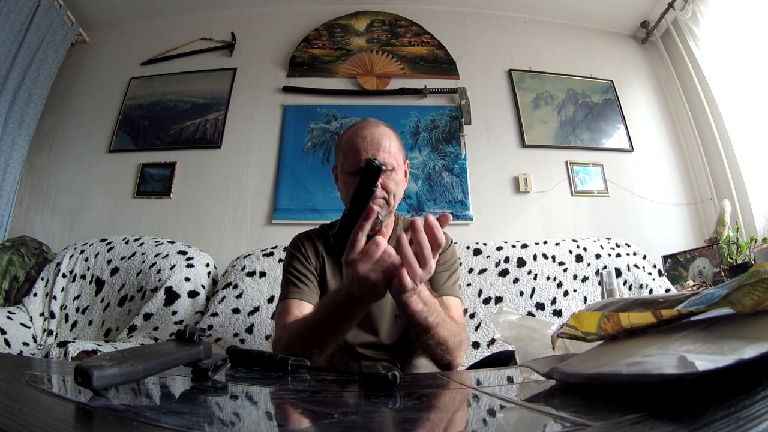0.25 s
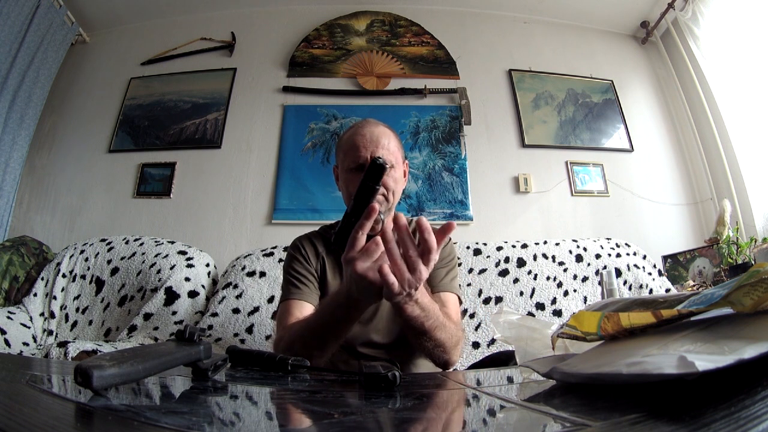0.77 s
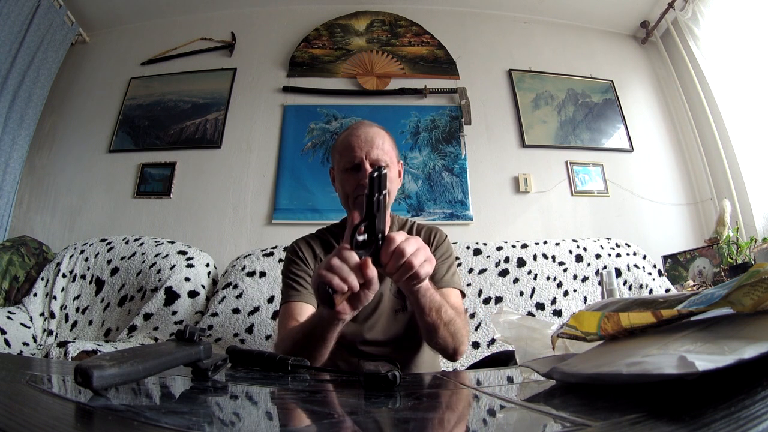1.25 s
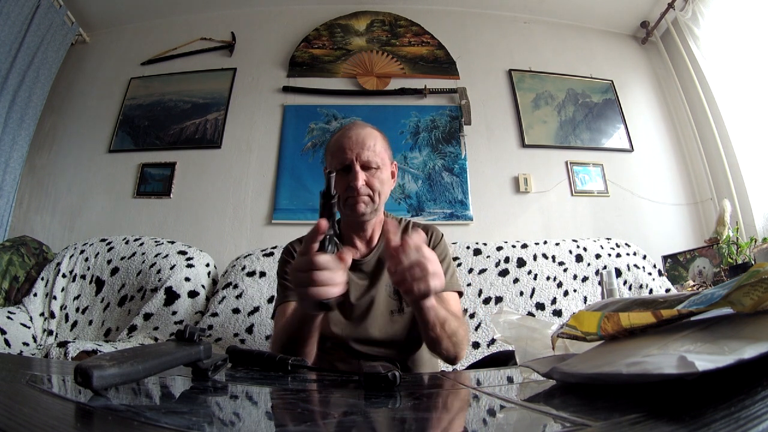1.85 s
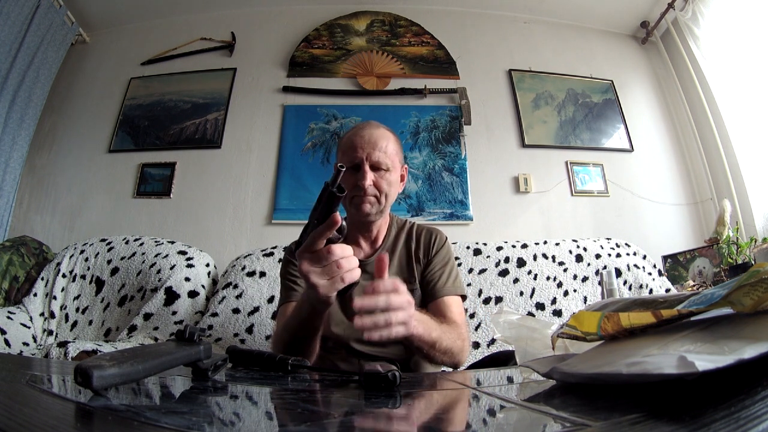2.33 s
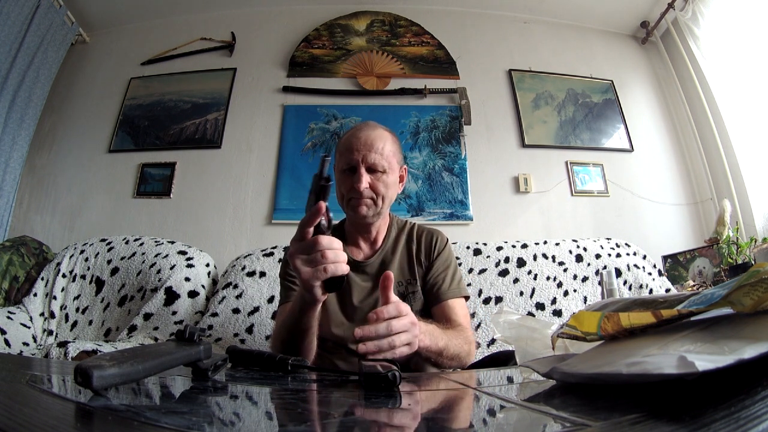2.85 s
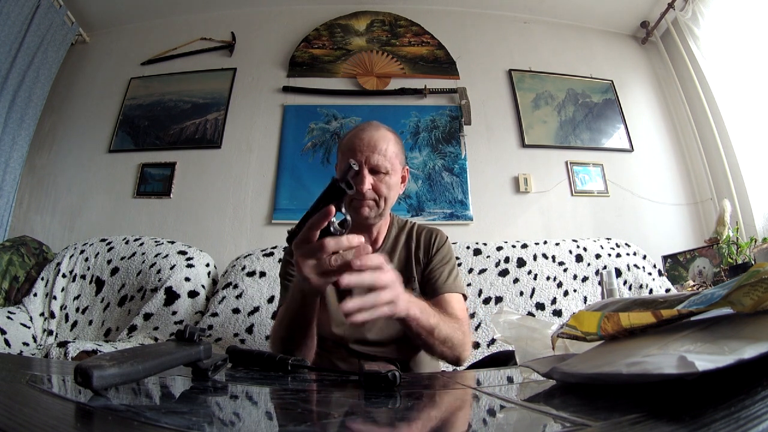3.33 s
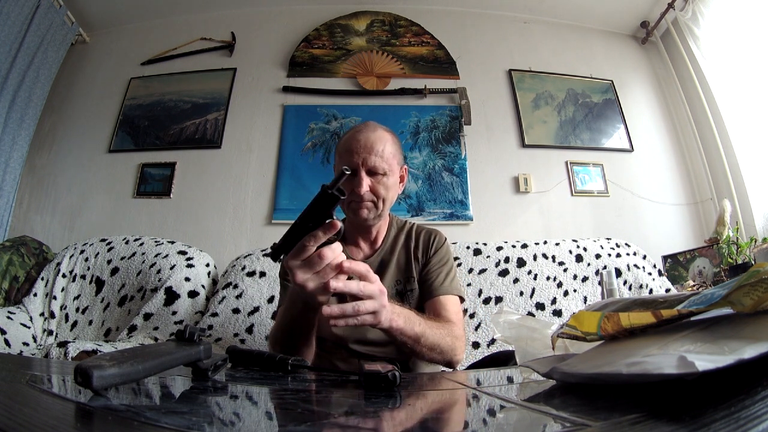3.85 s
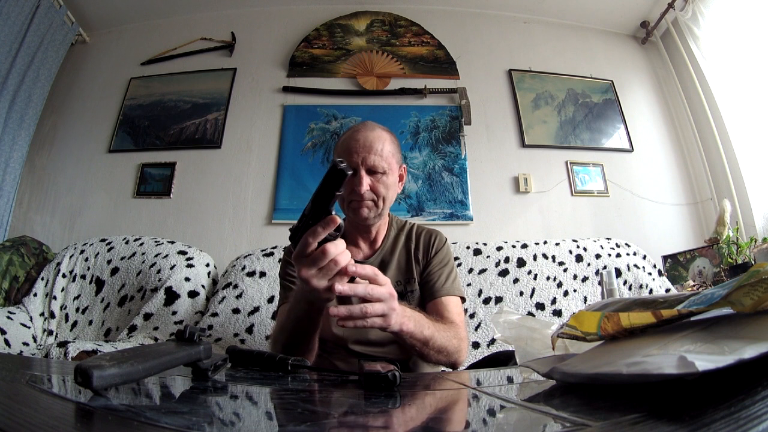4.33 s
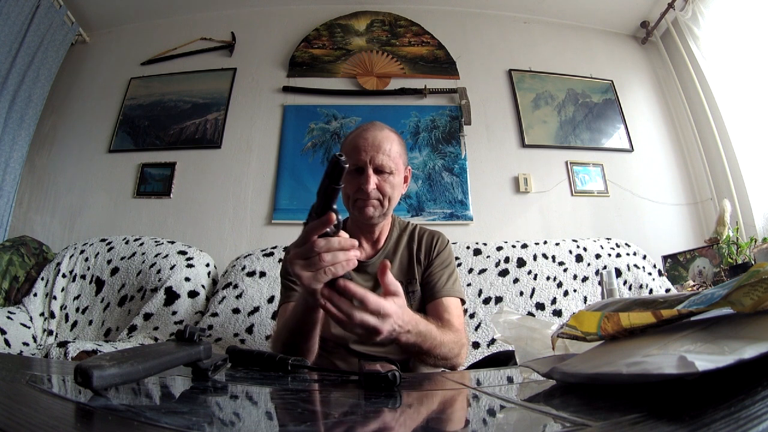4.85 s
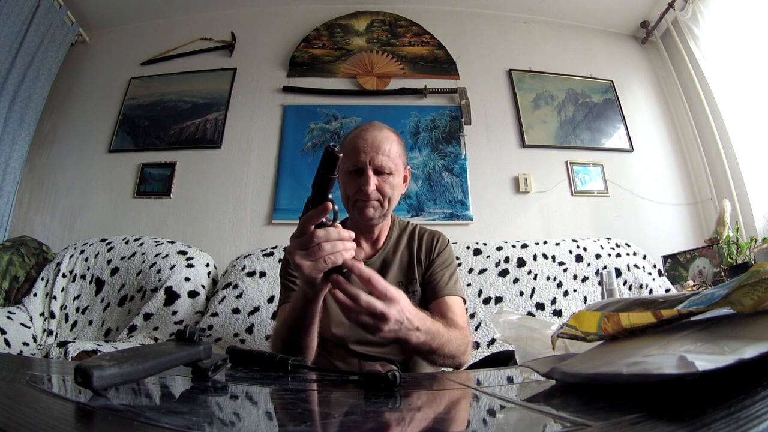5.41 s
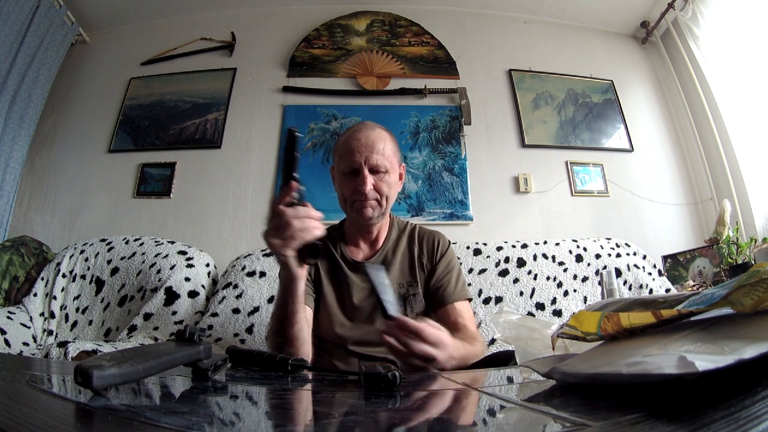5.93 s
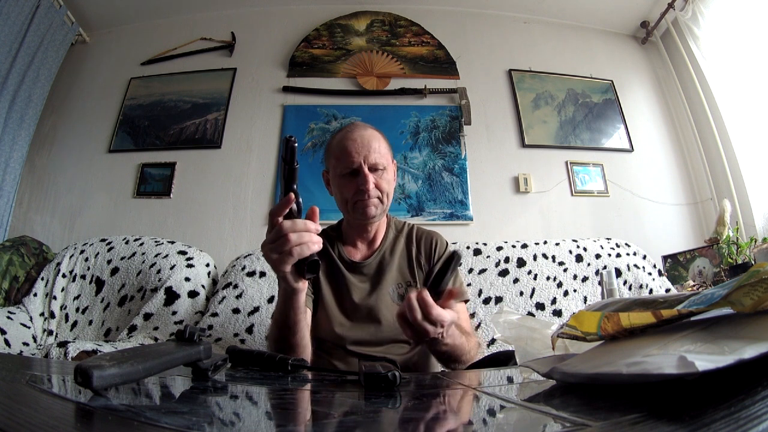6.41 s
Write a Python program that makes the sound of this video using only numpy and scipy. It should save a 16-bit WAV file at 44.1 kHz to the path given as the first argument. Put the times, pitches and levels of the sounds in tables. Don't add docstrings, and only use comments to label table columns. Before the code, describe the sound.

In a soft living room, hands work a pistol close to a small camera microphone. Clicks and a short scrape lead to a hard double clack at once, then a softer stop. The slide is racked again much louder, quiet handling follows with a very faint bird whistle, another violent clack rings out, then small clicks and dry magazine knocks and rubs over low room tone and slight hiss.

```python
import sys
import numpy as np
from scipy import signal
from scipy.fft import rfft, irfft
from scipy.io import wavfile
from scipy.ndimage import uniform_filter1d

SR = 44100
rng = np.random.default_rng(int(sys.argv[2]) if len(sys.argv) > 2 else 0)


def linear_from_db(decibels):
    return 10 ** (np.asarray(decibels, float) / 20)


def materialize(psi):
    bounded = np.clip(np.atleast_2d(psi).T, -1, 1)
    quanta = np.round(bounded * 32767).astype(np.int16)
    wavfile.write(sys.argv[1], SR, quanta)


N = 294091

# f/Hz, density level/dB
ROOM_TONE = [(10, -11), (30, -1), (64, -0.5), (150, -4), (420, -7), (860, -13), (2400, -20.5),
             (3050, -19.5), (3700, -25), (8000, -26), (12600, -25.5), (13000, -29.5), (15600, -29.5)]
# f/Hz, density level/dB
HISS = [(10, 1.5), (30, -7), (75, -2.5), (150, -8.5), (300, -19.5), (3000, -19), (12600, -18.5),
        (13000, -23.5), (15600, -25.5)]
ROOM_TONE_DB, HISS_DB = -58.5, -68.5
OFFSETS = [
    [-.0176],
    [-.0006],
]

# f/Hz, width/Hz, level/dB
FRAME_MODES = [(1367, 240, -7), (1716, 430, -2), (2210, 450, -5.5), (2660, 520, 0.5), (3190, 700, -2),
               (4500, 2400, -10)]
# f/Hz, width/Hz, level/dB
MAGAZINE_MODES = [(1750, 218, -0.5), (2883, 1730, -9.5), (3440, 280, 0), (5680, 380, -28)]
# start t/s, end t/s
MAGAZINE_IN_HAND = [
    (3.1, 3.8),
    (5.7, 6.1),
]
# f/Hz, level/dB, t60/s
STEEL_MODES = [(6360, -12, 0.07), (9670, -6, 0.013), (9820, 0, 0.024), (10650, -5, .05),
               (10860, -6.5, 0.043), (12060, -7, .04), (11880, -8, 0.022), (14800, -17, 0.019)]

# f/Hz, t60/s
ROOM_T60 = [(300, 0.69), (800, 0.3), (2100, 0.24), (5500, 0.22), (14600, 0.21)]
# f/Hz, level/dB
ROOM_COLOUR = [(300, -5.5), (800, -7), (1500, -1.5), (2700, -3.5), (5000, -3), (7500, -2), (10000, 3),
               (14000, -4)]

# t/s, peak level/dB, frame resonance f/Hz
FINGERS = [(0.002, -52, 1740), (0.415, -48, 1207), (0.448, -40, 2600), (1.016, -38, 2100),
           (1.048, -51.5, 2104), (1.235, -51.5, 2070), (1.269, -51, 946), (1.294, -49.5, 2110),
           (1.515, -45.5, 951), (2.815, -50, 2300), (2.94, -53, 1558), (3.846, -47, 1110)]
# t/s, peak level/dB, frame resonance f/Hz, crack level/dB re peak
CATCHES = [(0.09, -27, 2089, -26), (0.133, -29, 1800, -28), (0.156, -24, 3505, -24.5),
           (0.192, -10, 2193, -19), (0.204, -5, 2300, -20), (1.5, -35, 2165, -31),
           (1.535, -44.5, 2205, -26.5), (1.553, -42, 3288, -20.5), (1.572, -26.5, 3564, -11),
           (1.577, -21.5, 2250, -24), (1.583, -15, 1894, -13.5), (1.606, -19, 5600, -12),
           (1.618, -16, 2080, -17), (1.715, -20, 1030, -24), (1.719, -16.5, 2088, -26),
           (4.06, -9.5, 1939, -16.5), (4.072, -9.5, 2830, -22), (4.077, -8, 2500, -17),
           (4.095, -5.5, 3004, -13.5), (5.131, -39, 1407, -17.5), (5.154, -34.5, 3326, -21.5),
           (5.159, -27, 2140, -8), (5.17, -29.5, 3400, -20)]
# t/s, scrape level/dB
STROKES = [
    [(0.13, -52), (0.136, -37), (0.172, -25), (0.175, -25)],
    [(1.572, -35), (1.584, -16.5), (1.6, -34), (1.62, -38)],
    [(4.058, -21), (4.074, -26), (4.078, -6.5)],
    [(5.135, -52), (5.145, -49), (5.16, -27.5), (5.17, -54), (5.19, -58)],
    [(5.805, -51), (5.836, -42), (5.845, -33), (5.875, -49), (5.89, -32), (5.897, -41), (5.918, -26),
     (5.945, -33), (5.96, -50.5)],
]
# t/s, peak level/dB, frame resonance f/Hz, crack level/dB re peak, loss per rebound/dB
SLAMS = [
    (0.179, -1, 2600, -26, 5),
    (0.195, 6, 2620, -18.5, 11),
    (0.59, -10, 1750, -19.5, 2.35),
    (1.628, 9, 2557, -11.5, 7),
    (4.0807, 8.5, 1999, -5, 2.5),
]
REBOUND_S = [.003, .006, .0112]
REBOUND_HZ = [2900, 3260, 2500]
# t/s, length/s, height [full scale]
KICKS = [
    (1.6278, 0.0034, -0.2),
    (1.629, 0.0027, 0.31),
    (4.08, 0.0044, .15),
]
# start t/s, length/s, f/Hz, level/dB
CHIRPS = [
    (3.06, 0.13, 2900, -68),
    (6.468, 0.059, 2770, -67.5),
]
# t/s, peak level/dB, resonance f/Hz
KNOCKS = [(3.177, -54.5, 1854), (3.196, -47, 1818), (3.219, -56, 1829), (3.424, -52, 1210),
          (3.614, -45.5, 1546), (3.671, -39.5, 1900), (3.73, -37.5, 1800), (5.718, -27.5, 1652),
          (5.72, -33, 3200), (5.746, -48, 1735), (5.784, -47, 980), (5.81, -49, 3450), (5.839, -27.5, 1810),
          (5.846, -28, 1880), (5.917, -30, 3480), (5.925, -31, 1750), (5.936, -33.5, 3300),
          (5.945, -25.5, 1820), (6.038, -45, 1750)]


def rms_one(x):
    return x / np.sqrt(np.mean(x ** 2) + 1e-20)


def peak_one(x):
    return x / np.abs(x).max()


def at_hz(points, hz):
    table_hz, values = np.array(points).T
    return np.interp(np.log(hz + 1), np.log(table_hz), values)


def band(x, low_hz, high_hz):
    edges = [low_hz, min(high_hz, 0.45 * SR)]
    return signal.sosfilt(signal.butter(2, edges, "band", fs=SR, output="sos"), x)


def resonance(x, hz, width_hz):
    r = np.exp(-np.pi * width_hz / SR)
    poles = [1, -2 * r * np.cos(2 * np.pi * hz / SR), r * r]
    return signal.lfilter([(1 - r * r) / 2, 0, (r * r - 1) / 2], poles, x)


def coloured_noise(spectrum):
    hz = np.fft.rfftfreq(N, 1 / SR)
    white = rfft(rng.standard_normal(N))
    return rms_one(irfft(white * linear_from_db(at_hz(spectrum, hz)), N))


def room_tone():
    return linear_from_db(ROOM_TONE_DB) * coloured_noise(ROOM_TONE)


def amplifier_rest():
    return linear_from_db(HISS_DB) * coloured_noise(HISS) * [[1], [-1]] + OFFSETS


def finger_touches():
    crack_db, thud_db, t60 = -24, -6.5, 0.017
    return [(s, db, hz, crack_db, thud_db, t60) for s, db, hz in FINGERS]


def hollow(x, modes):
    out = 0
    for k, (hz, width_hz, level_db) in enumerate(modes):
        out = out + (-1) ** k * linear_from_db(level_db) * resonance(x, hz, width_hz)
    return out


def part_at(s):
    in_hand = any(start < s < end for start, end in MAGAZINE_IN_HAND)
    return MAGAZINE_MODES if in_hand else FRAME_MODES


def steel(x):
    return sum(linear_from_db(level_db) * resonance(x, hz, np.log(1000) / np.pi / t60)
               for hz, level_db, t60 in STEEL_MODES)


def contacts():
    out, t = np.zeros((2, N + SR)), np.arange(SR // 10) / SR
    click = 1.0 * (t == 0)
    ringing = steel(click)
    crack = peak_one(band(click, 6500, 13500)) + linear_from_db(1.0) * ringing / np.sqrt(np.sum(ringing ** 2))
    thud = band(band(click, 650, 1300), 330, 1300)
    touches = finger_touches() + catch_touches() + slam_touches() + magazine_knocks()
    for s, peak_db, hz, crack_db, thud_db, t60 in touches:
        onset = 1 - np.exp(-t / 0.00008)
        rattle = rng.standard_normal(len(t)) * onset * linear_from_db(-60 * t / np.clip(t60, 0.004, 0.06))
        rattle[6] += 3.0
        body = rms_one(resonance(click, hz, 390)) + linear_from_db(-6.0) * rms_one(hollow(click, part_at(s)))
        body = band(band(body, 1000, 7600), 770, 8500)
        at = round(s * SR)
        for response, level_db in (body, peak_db), (crack, peak_db + crack_db), (thud, peak_db + thud_db):
            facing = linear_from_db(level_db) * peak_one(signal.fftconvolve(rattle, response)[:len(t)])
            all_round = rms_one(response) * facing.std()
            out[:, at:at + len(t)] += [facing, all_round]
    return out[:, :N]


def room(x):
    level_db, first_wall_s, build_up_s = -9.5, 0.0044, 0.0095
    t = np.arange(SR // 2) / SR
    edges = 200 * 2 ** np.arange(0, 6.6, 0.5)
    build = np.clip((t - first_wall_s) / build_up_s, 0, 1)
    tail = 0
    for low, high in zip(edges, edges[1:]):
        hz = np.sqrt(low * high)
        white = rng.standard_normal((2, len(t))) * build
        decay_db = at_hz(ROOM_COLOUR, hz) - 60 * t / at_hz(ROOM_T60, hz)
        tail = tail + band(white, low, high) * linear_from_db(decay_db)
    tail = tail / np.sqrt(np.sum(tail[0] ** 2))
    return linear_from_db(level_db) * signal.fftconvolve([x], tail, axes=1)[:, :N]


def catch_touches():
    thud_db, t60 = -17, 0.022
    return [(s, db, hz, crack_db, thud_db, t60) for s, db, hz, crack_db in CATCHES]


def scrape():
    t, out = np.arange(N) / SR, 0
    ticks_per_s = 3500
    sizes = linear_from_db(3 * np.minimum(rng.exponential(1, N), 4)) * rng.choice([-1, 1], N)
    ticks = sizes * (rng.random(N) < ticks_per_s / SR) + 1e-18
    bright = linear_from_db(-27.5) * rms_one(band(ticks, 4400, 13000))
    for rows in STROKES:
        level_db = np.interp(t, *np.transpose(rows), left=-200, right=-200)
        body = rms_one(band(hollow(ticks, part_at(rows[0][0])), 790, 4500))
        out = out + linear_from_db(level_db - 7) * (body + bright)
    return out


def slam_touches():
    t60, rebound_dull_db = 0.016, 5.0
    rows = []
    for s, db, hz, crack_db, loss_db in SLAMS:
        thud_db = -19 - 0.6 * db
        rows.append((s, db, hz, crack_db, thud_db, t60))
        for k, (late, again_hz) in enumerate(zip(REBOUND_S, REBOUND_HZ), start=1):
            rows.append((s + late, db - loss_db * k, again_hz, crack_db - rebound_dull_db, thud_db, t60))
    return rows


def overload(x):
    cut_off = np.clip(x, -1.1, 1.1) - x
    return x + signal.sosfilt(signal.butter(1, 248, "high", fs=SR, output="sos"), cut_off)


def capsule_kicks():
    out = np.zeros(N)
    for s, length, height in KICKS:
        bump = height * np.hanning(round(length * SR))
        at = round(s * SR)
        out[at:at + len(bump)] += bump
    return out


def bird():
    out = np.zeros(N)
    for s, length, hz, level_db in CHIRPS:
        n = round(length * SR)
        waver = 40 * uniform_filter1d(rng.standard_normal(n), size=200) * 14
        whistle = np.sin(2 * np.pi * np.cumsum(hz + waver) / SR)
        at = round(s * SR)
        out[at:at + n] += linear_from_db(level_db) * signal.windows.tukey(n, 0.3) * whistle
    return out


def magazine_knocks():
    crack_db, thud_db, t60 = -32.5, -20.5, 0.009
    return [(s, db, hz, crack_db, thud_db, t60) for s, db, hz in KNOCKS]


def scene():
    facing, all_round = contacts() + scrape()
    common, differing = room(all_round)
    heard = facing + common + bird() + room_tone()
    apart = linear_from_db(-20) * band(differing + linear_from_db(5.0) * np.gradient(facing), 1900, 9500)
    return heard + apart * [[1], [-1]]


def top_cut(x):
    return signal.sosfilt(signal.butter(12, 15050, fs=SR, output="sos"), x)


def record(dry):
    kicked = overload(dry) + capsule_kicks()
    dull = signal.sosfilt(signal.butter(1, 14000, fs=SR, output="sos"), kicked)
    mix = np.clip(dull + amplifier_rest(), -1, 1)
    return top_cut(mix)


dry = scene()
out = record(dry)
materialize(out)
```